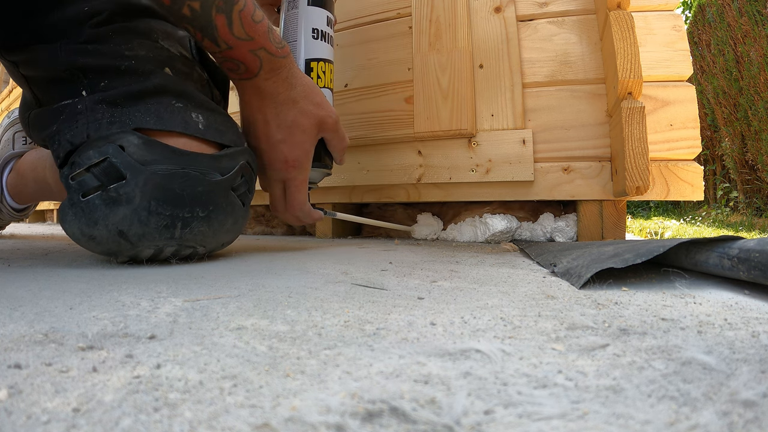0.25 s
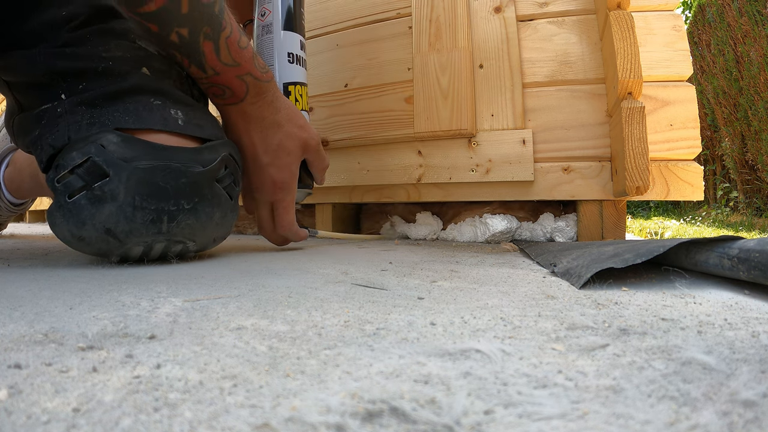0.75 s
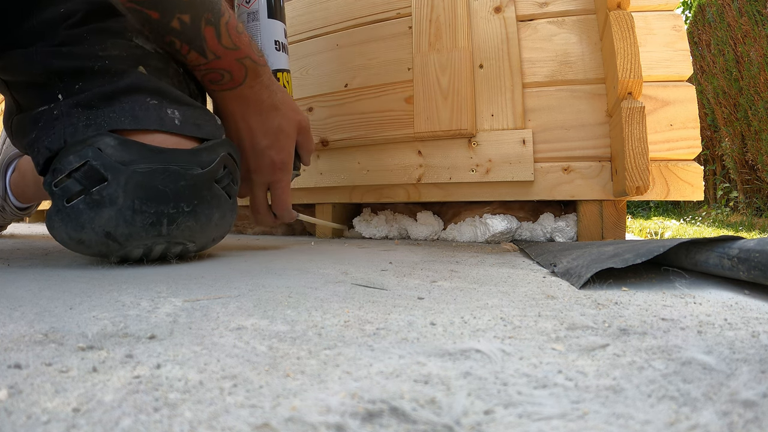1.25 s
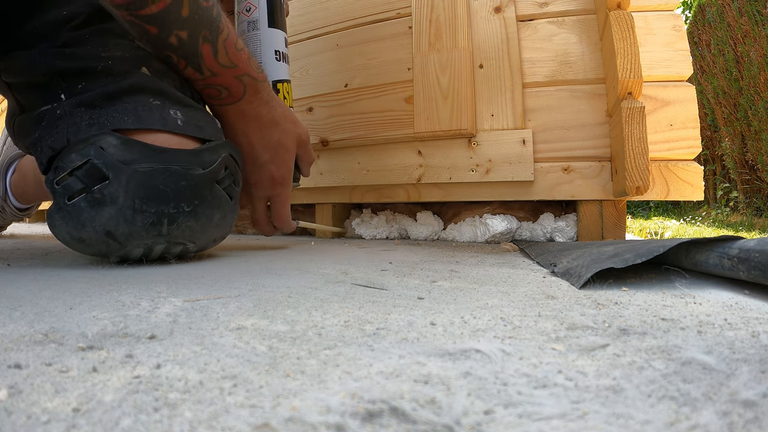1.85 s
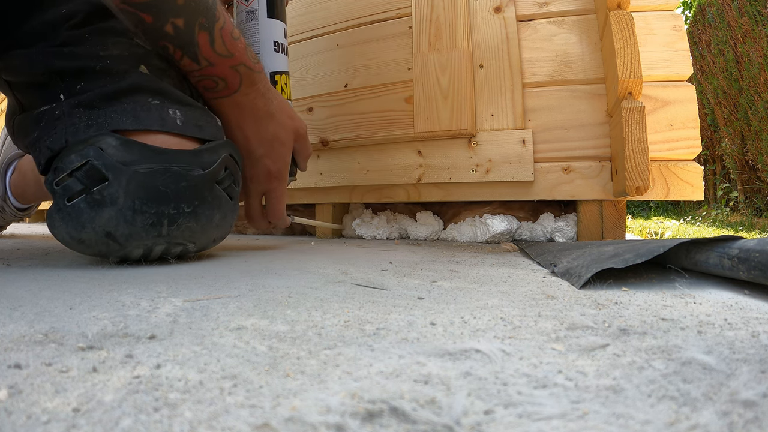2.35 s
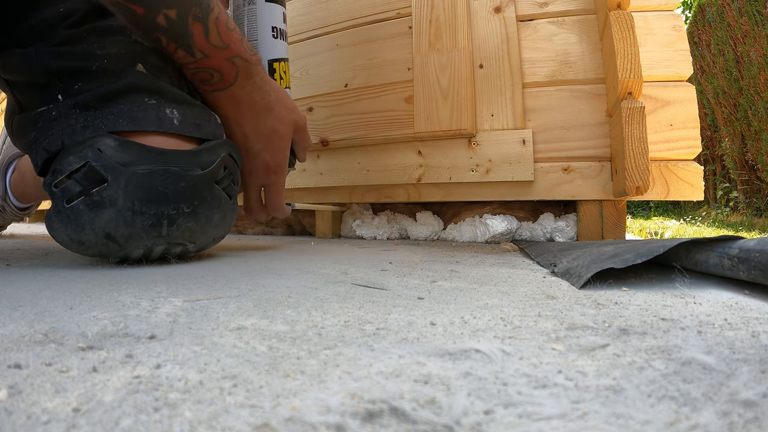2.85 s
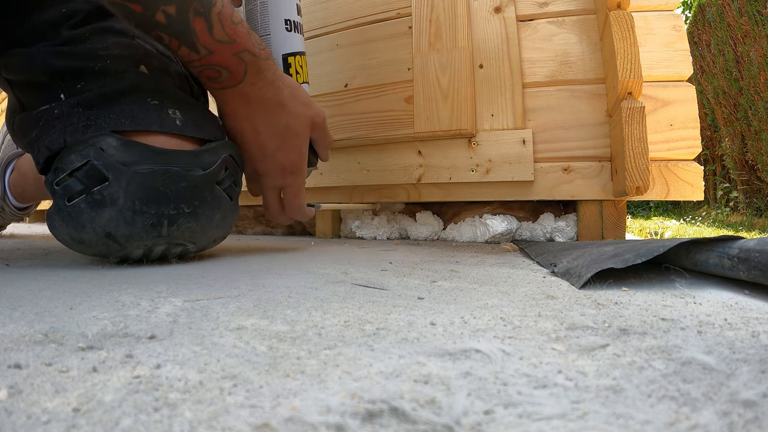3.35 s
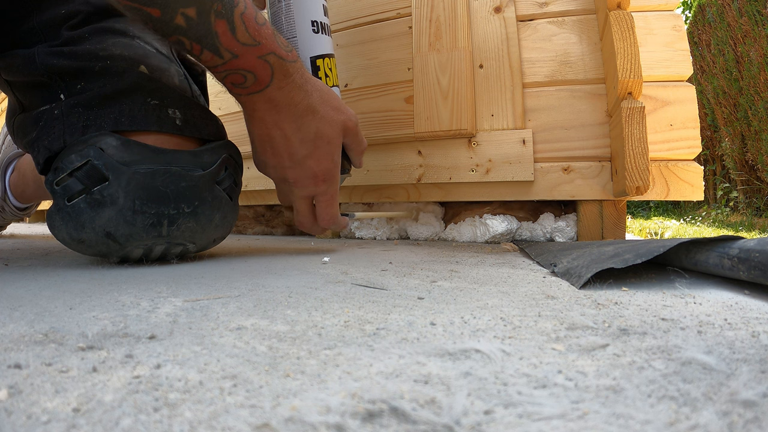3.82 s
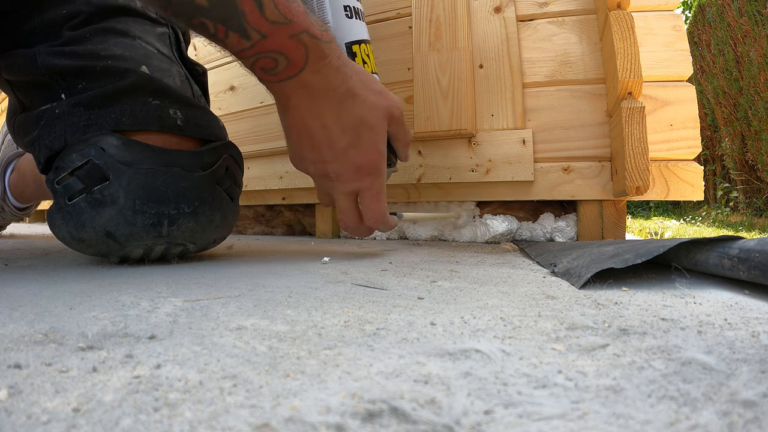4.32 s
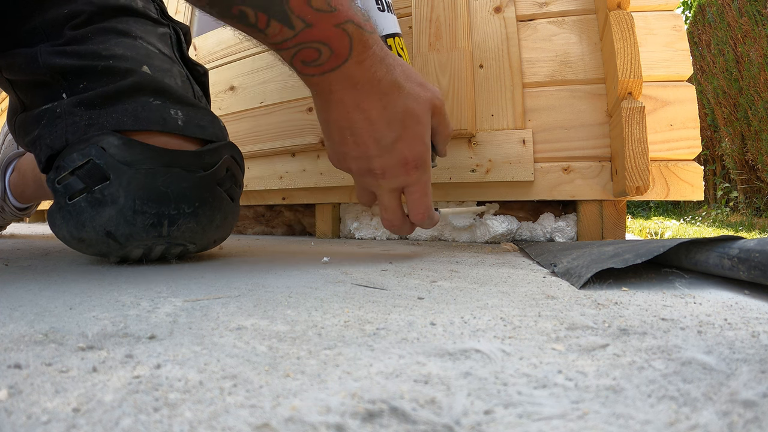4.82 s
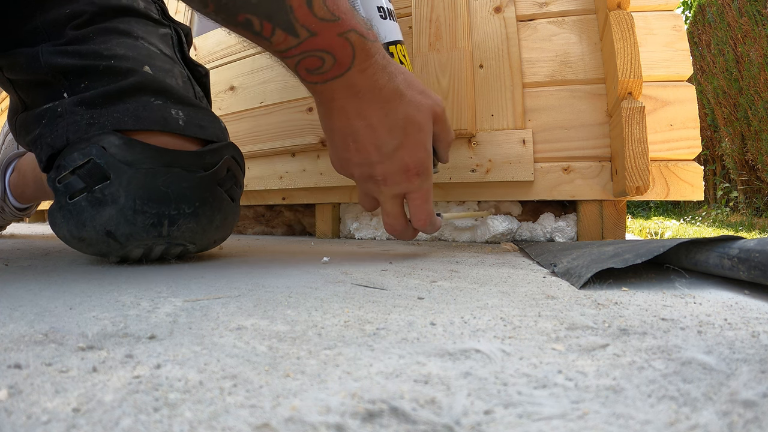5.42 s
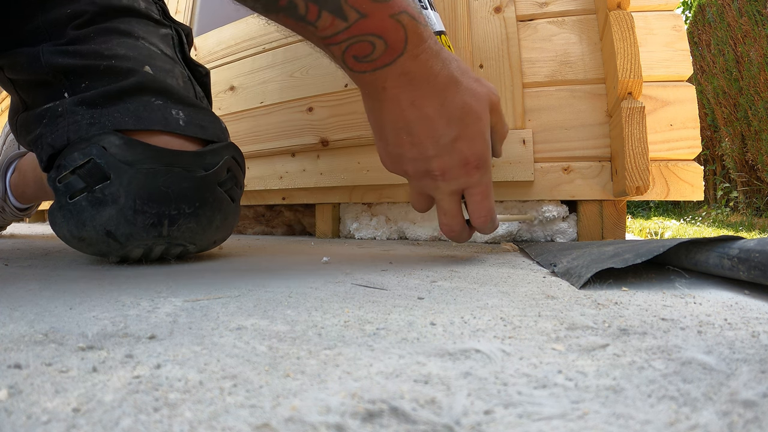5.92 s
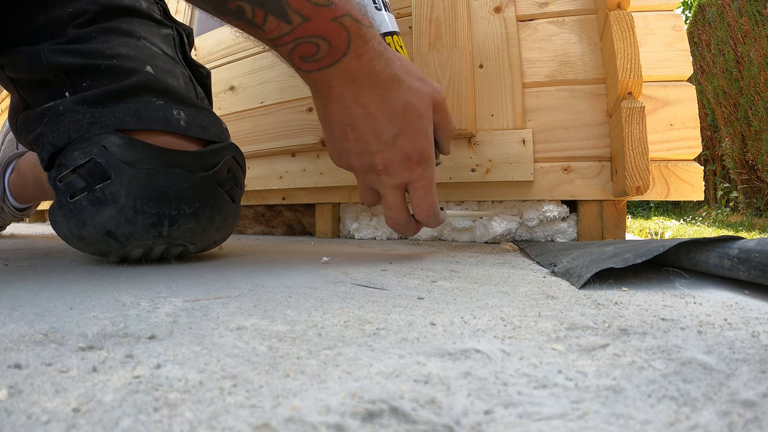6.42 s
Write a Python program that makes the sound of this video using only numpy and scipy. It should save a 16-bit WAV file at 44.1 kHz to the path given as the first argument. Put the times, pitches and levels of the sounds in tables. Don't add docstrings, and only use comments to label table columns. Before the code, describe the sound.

Aerosol foam hisses from a thin straw in sharp short spurts and longer steady jets, with gurgles, tiny snaps and fading fizz in a quiet garden.

```python
import sys
import numpy as np
from scipy import signal
from scipy.fft import rfft, irfft
from scipy.io import wavfile
from scipy.ndimage import uniform_filter1d

SR = 44100
rng = np.random.default_rng(int(sys.argv[2]) if len(sys.argv) > 2 else 0)


def attenuation_scalar(level_db):
    decades = np.asarray(level_db, float) / 20
    return 10 ** decades


def pcm_store(signal):
    levels = np.round(np.clip(np.atleast_2d(signal), -1, 1) * 32767)
    wavfile.write(sys.argv[1], SR, levels.astype(np.int16).T)


N = 294147

# time_s, gas_flow_db, foam_load_db
FIRST_STROKES = [
    [(0, -39, 1), (.25, -42, -1.5), (.308, -33, -3.5), (.388, -37.5, -3), (.444, -32, -3.5),
     (.505, -39, -6.5), (.54, -59, -10.5), (.585, -66, -20)],
    [(.603, -44.5, 1.5), (.65, -58.5, -1), (.7, -75, 4.5)],
    [(.718, -58, -2.5), (.762, -47, 0), (.772, -24.5, 2), (.792, -30, 4), (.803, -12.5, -0.5),
     (1.04, -14, -2.5), (1.06, -13, 3), (1.128, -12.5, -2), (1.206, -15.5, 1.5)],
    [(1.743, -57.5, 3.5), (1.749, -41, 3.5), (1.762, -32.5, 2.5), (1.788, -25, 4), (1.798, -10.5, 1),
     (1.84, -14.5, -1.5), (1.886, -12.5, 2.5), (1.896, -14, -3.5), (1.908, -34.5, 1)],
]
SHORT_STROKES = [
    [(2.293, -49.5, -2.5), (2.297, -33, 6.5), (2.316, -32.5, -5), (2.323, -19.5, 3), (2.377, -12.5, 0),
     (2.402, -12.5, -4.5), (2.407, -23.5, -3), (2.418, -31.5, 3.5)],
    [(2.872, -61, -5), (2.876, -50.5, 3), (2.912, -48, -7.5), (2.918, -33, 2), (2.936, -30.5, 4.5),
     (2.952, -16.5, 3), (2.996, -16.5, 0), (3.024, -18, -2), (3.036, -38, 1.5)],
    [(3.28, -76, -9.5), (3.305, -72, -8.5), (3.33, -66, -4.5), (3.345, -74.5, -7.5), (3.365, -74, -6.5)],
]
LONG_STROKES = [
    [(3.37, -82.5, -5), (3.383, -60.5, -1), (3.4, -49.5, 1), (3.404, -36.5, -2.5), (3.428, -32.5, 7.5),
     (3.438, -20.5, 0), (3.63, -20, -1), (3.94, -18.5, -1.5), (4.078, -19, -0.5), (4.278, -19, -0.5),
     (4.406, -17.5, 1), (4.412, -28, 6)],
    [(4.861, -83, -18), (4.92, -78, -16.5), (5.0, -76.5, -18), (5.03, -67, -9.5), (5.099, -62, 2),
     (5.129, -54.5, 6.5), (5.15, -61, 1), (5.245, -58.5, 3), (5.275, -63.5, -1.5), (5.39, -57.5, 1)],
    [(5.395, -56.5, -8), (5.407, -39.5, 2.5), (5.432, -27.5, -1), (5.44, -17, 0.5), (5.46, -18.5, -5.5),
     (5.55, -17.5, -4.5), (5.8, -19.5, 1.5), (5.952, -19, -0.5), (5.998, -23.5, 2)],
]
STROKES = FIRST_STROKES + SHORT_STROKES + LONG_STROKES

# (centre_hz, width_hz, level_db)
STRAW_PLACES = [
    (0, -19, 7870, -4.5, [(475, 310, -9.5), (960, 380, -19), (1670, 190, -20), (2800, 560, -14.5), (3400, 490, -12.5), (7070, 1200, -16), (10160, 600, -35.5)]),
    (0.252, -23, 8160, -7, [(490, 370, -3.5), (865, 410, -10), (1604, 74, -14), (3160, 470, -11), (6990, 2000, -20), (8740, 530, -31.5), (10300, 460, -26)]),
    (0.53, -12, 2300, -1.5, [(400, 630, -1.5), (1300, 700, -14.5), (4530, 1500, -12), (7200, 1400, -15)]),
                (.7, -2.5, 8900, -4.5, [(970, 120, 0), (1710, 160, -5), (2030, 140, -11.5), (2700, 360, -1), (3225, 560, 12), (4020, 500, 4), (4720, 350, -2), (5400, 400, -8), (6100, 350, -1), (6600, 200, -1), (7650, 1100, -2.5), (10140, 1400, -5)]),
    (.91, -7, 8900, -5, [(470, 200, -2.5), (985, 130, 1.5), (1637, 130, -6.5), (2090, 150, 0), (3200, 570, 8.5), (5800, 600, -3), (6770, 300, 0.5), (7700, 450, -1.5), (9430, 310, -6), (10680, 600, -7.5)]),
    (1.02, -8.5, 9000, -6, [(655, 450, -8.5), (998, 150, 4.5), (1604, 110, -3), (2080, 230, -1.5), (2690, 250, 4.5), (3290, 500, 9), (4010, 470, 5), (5600, 920, 3), (6930, 670, 0), (7960, 270, -8), (10200, 500, -14.5)]),
                (1.5, -12, 9100, -10.5, [(1025, 100, -1), (1620, 110, -5), (2080, 94, -4), (2800, 190, -3), (3240, 390, 6), (3794, 150, 1), (4200, 380, -8.5), (6990, 730, -10), (10070, 690, -21)]),
    (2.2, -7, 8760, -8.5, [(1017, 130, 5.5), (1620, 260, -4.5), (2060, 170, -3.5), (3260, 130, 7), (3650, 200, 2.5), (3980, 210, -1.5), (5400, 260, -9), (6950, 730, -6), (7830, 430, -12), (10590, 650, -10.5)]),
                (2.7, -2, 8770, -5.5, [(1082, 140, 5.5), (1598, 110, 0.5), (3075, 210, 5.5), (3690, 150, -4.5), (4240, 450, 0), (5080, 150, -9.5), (5570, 240, -7), (6325, 840, -4), (7240, 800, -1), (9940, 500, -14.5)]),
                (3.2, -3.5, 2240, -13, [(1040, 150, 6.5), (1610, 150, -9), (3147, 130, -2), (3970, 220, -8), (5340, 390, 6), (6200, 870, 4), (7120, 250, -1), (8830, 600, -9), (9500, 330, -5)]),
    (3.56, -4, 2220, -5.5, [(1006, 300, -1.5), (3115, 150, 2), (4000, 470, 5.5), (5330, 690, 5), (6710, 500, -2), (7950, 250, -9), (9140, 390, -7), (11100, 600, -13)]),
    (3.7, -2.5, 2000, -9.5, [(1036, 390, -1.5), (3036, 160, 5), (3696, 240, 2.5), (3980, 150, 0.5), (4940, 390, 4), (5530, 490, 4.5), (6500, 330, 0.5), (8660, 140, -9), (9450, 500, -0.5)]),
    (3.87, -4, 1650, -3, [(690, 520, 1), (1000, 320, -0.5), (3110, 550, 5), (3700, 200, 7), (4170, 470, 2.5), (5360, 430, -1), (5740, 300, 1), (6760, 250, -3.5), (9300, 490, -8)]),
                (4.0, -1, 1500, -1, [(512, 150, 4), (980, 400, 4.5), (2620, 300, -3.5), (3150, 350, 9.5), (5350, 300, 2), (5970, 300, 4.5), (9000, 900, -4.5)]),
    (4.11, 0.5, 1500, -8, [(515, 120, -1), (900, 440, 5), (2570, 250, 2), (3080, 400, 2), (3710, 230, 6.5), (4440, 230, -1), (5160, 220, 0.5), (6070, 300, 1.5), (9000, 900, -5)]),
    (4.23, 0.5, 7275, -3.5, [(745, 410, 2.5), (2480, 680, 7.5), (3070, 500, 10.5), (3500, 250, 14), (5705, 910, 1.5), (6400, 300, -4), (7920, 160, -0.5), (8600, 390, -5.5), (9990, 180, -9)]),
                (4.7, -26, 1368, -29.5, [(430, 570, 12), (2650, 600, -14), (5630, 570, -20.5), (8590, 550, -23.5)]),
    (5.02, -27, 1353, -33.5, [(430, 540, 9), (2566, 350, -14), (3030, 180, -15.5), (3656, 230, -20), (5656, 570, -20), (6730, 660, -27), (8600, 480, -26.5), (11000, 500, -28.5)]),
                (5.39, -2.5, 1500, -8, [(474, 640, -4.5), (817, 300, 0.5), (3050, 350, 7), (3500, 140, 4.5), (4330, 201, 0), (5506, 540, 7.5), (6070, 540, 1.5), (7280, 200, -6.5), (8600, 600, -7), (10300, 400, -2.5)]),
    (5.58, -3, 1600, -3.5, [(774, 390, 5.5), (2793, 430, 2.5), (3500, 200, -1.5), (5530, 640, 5.5), (6200, 360, 5), (7120, 360, -0.5), (7650, 230, -5.5), (10080, 800, -10)]),
    (5.76, -2.5, 7000, -3.5, [(600, 270, -2.5), (2860, 330, 7.5), (3570, 160, 0), (4090, 200, -5), (5300, 730, 5.5), (6320, 197, -6), (7750, 520, -3.5), (8950, 350, -8.5), (10400, 730, -4)]),
    (5.88, -1.5, 7000, 0.5, [(698, 540, 6), (2840, 280, 5), (3480, 170, 2), (5010, 550, 3.5), (6450, 310, -0.5), (7694, 600, -3.5), (10380, 580, -6.5)]),
]
PLACES = STRAW_PLACES

# frequency_hz, level_db_per_hz
JET_SPECTRUM = [(24, -51), (40, -24.5), (267, -3), (473, 6.5), (563, 0.5), (976, 3), (1190, -10.5),
                (1780, -5), (2340, -6.5), (3070, -0.5), (4470, -8.5), (5320, -6.5), (8770, -7),
                (15600, -15)]
# time_s, treble_db
TIP_AIM = [(0, 3.5), (.3, 1.5), (.5, 0), (.56, 3.5), (.66, 3), (.74, -3), (.79, -1.5), (.805, -1), (.9, 3),
           (1.02, -2), (1.14, 4), (1.21, 0.5), (3.45, 1.5), (3.6, 2), (3.75, 1), (4.0, -1), (4.3, 1.5),
           (4.95, -7), (5.04, .5), (5.47, 0.5), (5.6, -0.5), (5.74, 1), (5.95, 0.5)]
# time_s, level_at_14khz_db
HAND_SHADE = [(0, -0.5), (.85, -2.5), (1.1, -1), (1.8, -6.5), (2.4, -3), (3.0, -3), (3.6, 0.5), (4.3, -4),
              (5.2, 1), (5.7, 1)]
# gurgle_db, sizzle_db, air_db, treble_sag_db (as pressure drops), fizz_db
STRAW_LIE = [(-7, -11, -20.5, 7, -79), (-33, -14, -21, -0.5, -87.5), (-17, -4.5, -14, 9.5, -47.5),
             (-18.5, -3.5, -9, 23, -52), (-14, -3, -10.5, 11.5, -49.5), (-12.5, 0.5, -7.5, 9.5, -43.5),
             (-14.5, 3, -12, 0, -96), (-12.5, 1, -9, 7.5, -51), (-22, -4.5, -13.5, 3.5, -85),
             (-13, -0.5, -10.5, 1, -51)]

DB_PER_FLOW = (0.44, 1, 1, 0.84)
DB_PER_FOAM = (1, -0.014, 0.037, -0.49)
DB_PER_SAG = (0.12, 0.081, -0.92, -0.63)
DB_PER_AIM = (-0.12, -0.93, 1.5, 0.25)
SHUT_DB_PER_S = (430, 980, 1180, 1050)
OPEN_DB_PER_S = (3500, 1800, 1500, 1500)
SWELL_DB = (0.32, 0.22, 0.94, 0.88)
PLUG_DB, PLUG_S = (0.5, 2.5, -9.5, 0), 0.014
EASE_S = 0.0048

MOTTLE_DB, MOTTLE_HZ, MOTTLE_S = 0.9, 600, 0.07
GRAIN_DB, GRAIN_HZ, GRAIN_S = 2.2, 45, 0.16

# time_s, peak_db,
# lowest_hz, highest_hz
SKIN_SNAPS = [(0.1144, -28.5, 3000, 3800), (.205, -36, 2500, 4000), (0.28, -27.5, 2615, 3800),
              (0.3144, -40.5, 4300, 6470), (0.5427, -42, 900, 5300), (0.5891, -46, 3300, 9000),
              (0.6058, -35, 3010, 8360), (.607, -40.5, 800, 2406), (0.617, -37.5, 898, 5500),
              (0.637, -49.5, 1000, 7450), (.7175, -47.5, 1197, 3500), (.727, -43, 2700, 3588),
              (.7323, -39, 2600, 4800), (1.751, -42.5, 9510, 12030), (1.764, -41, 9460, 12020),
              (3.3213, -46.5, 500, 1800), (4.7552, -57.5, 500, 4800), (5.1094, -55.5, 5000, 12000),
              (5.127, -52, 4940, 12000), (5.215, -52, 1206, 2300)]
# time_s, peak_db, pitch_hz
FOAM_BLOBS = [(0.606, -42, 940), (.7175, -36.5, 480), (0.732, -32.5, 368), (3.293, -38, 383.4),
              (3.321, -38.5, 622), (3.334, -30.5, 300), (3.34, -34, 300), (3.385, -27, 430),
              (5.05, -46, 436), (5.076, -45, 359), (5.104, -38.5, 430), (5.116, -39, 500),
              (5.128, -37, 330), (5.166, -36.5, 351), (5.177, -30.5, 420), (5.215, -28, 470),
              (5.215, -37.5, 926), (5.241, -39.5, 400), (5.249, -32.5, 480), (5.259, -28.5, 428),
              (5.314, -49, 757), (5.323, -33, 500), (5.349, -42, 352), (5.363, -37, 760),
              (5.37, -39.5, 300), (5.382, -29, 393)]
# time_s, level_db, decay_s
GAS_PUFFS = [
    (.765, -40, 0.098),
    (1.75, -38, 0.11),
    (2.296, -40.5, 0.11),
    (2.914, -43.5, 0.051),
    (3.4, -38, 0.19),
    (5.405, -38.5, 0.079),
]

# frequency_hz, level_db_per_hz
FIZZ_SPECTRUM = [(290, -30), (500, 4), (583, -10.5), (739, -1.5), (861, -12), (1250, -15), (1420, 0),
                 (3190, -5), (8360, -13.5), (14000, -32)]
FIZZ_BODY_DB = (0, -1, -1.5, -0.5, 0.5, -5, -1, 6.5, 0, 1)
FIZZ_RING_DB = (-10, -9, -9.5, -3, -10.5, 0, -8.5, -3, -7, -4.5)
FIZZ_PACE = (1, 1, 1.05, 0.91, 1.05, 1.1, 1, 1.2, 1, 1.3)
FIZZ_FADE = (1.1, 0.88, 1.6, 1.5)
FIZZ_DB_PER_S, FROTH_DB, FROTH_DB_PER_S = 64.5, 10.5, 454

# frequency_hz, t60_s
ECHO_DECAY = [(200, 0.16), (1000, 0.94), (3000, 0.1), (8000, 0.089), (15000, 0.042)]
# frequency_hz, level_db_per_hz
GARDEN_SPECTRUM = [(20, -14.5), (70, -5.5), (100, -10.5), (170, -12.5), (240, -22.5), (400, -19.5),
                   (770, -28), (1150, -30), (1600, -36), (2850, -38), (5000, -38.5), (8000, -42.5),
                   (15700, -43)]
# middle_s, half_length_s, level_db
DRONE_SWELLS = [
    (1.658, 0.056, -66),
    (2.207, 0.18, -62),
    (2.578, 0.049, -55),
    (6.658, 0.36, -63),
]
GARDEN_DB, DRONE_DB = -58.5, -85.5


def evened(x):
    return x / np.sqrt(np.mean(x ** 2) + 1e-20)


def read(points, hz):
    f, value = np.transpose(points)
    return np.interp(np.log(hz + 1), np.log(f + 1), value)


def add(mix, s, sound):
    part = mix[round(s * SR):][:len(sound)]
    part += sound[:len(part)]


def filtered(x, order, edges_hz, kind):
    return signal.sosfilt(signal.butter(order, edges_hz, kind, fs=SR, output="sos"), x)


def smooth_patches(patches, bins, frames):
    patches = uniform_filter1d(patches, max(round(bins), 1), 0)
    return evened(uniform_filter1d(patches, max(round(frames), 1), 1))


def noise(gain, size, patchy_db, patch_hz, patch_s):
    hop = size // 4
    hz = np.fft.rfftfreq(size, 1 / SR)
    t = np.arange(N // hop + 5) * hop / SR
    real, imaginary, patches = rng.standard_normal((len(t), len(hz), 3)).T
    patches = smooth_patches(patches, patch_hz * size / SR, patch_s * SR / hop)
    z = (real + 1j * imaginary) * gain(hz[:, None], t) * attenuation_scalar(patchy_db * patches)
    return signal.istft(z, nperseg=size, noverlap=size - hop)[1][:N]


def mottle(hz, t, db, width_hz, seconds):
    patches = rng.standard_normal((len(hz), len(t)))
    return attenuation_scalar(db * smooth_patches(patches, width_hz / hz[1, 0], seconds / t[1]))


def flutter(hz):
    lowpass = signal.butter(2, hz, fs=SR, output="sos")
    return evened(signal.sosfiltfilt(lowpass, rng.standard_normal(N + 2 * SR))[SR:-SR])


def wander(t, hz):
    rates = hz * np.geomspace(0.3, 2, 8)
    return sum(np.sin(2 * np.pi * (f * t + rng.random())) for f in rates) / 2


def garden():
    def floor_gain(hz, t):
        rumble_db = 1.2 * wander(t, hz=2.2) / (1 + (hz / 250) ** 2)
        return attenuation_scalar(read(GARDEN_SPECTRUM, hz) + rumble_db)

    def drone_gain(hz, t):
        peak = 1 / (1 + ((hz - 1170) / 130) ** 2)
        return peak + 0.15 / (1 + (hz / 4500) ** 4) + 0.28 / (1 + (hz / 800) ** 4)

    floor = evened(noise(floor_gain, 1024, patchy_db=2.5, patch_hz=300, patch_s=0.1))
    drone = evened(noise(drone_gain, 1024, patchy_db=3.0, patch_hz=200, patch_s=0.08))
    t = np.arange(N) / SR
    swells = attenuation_scalar(DRONE_DB)
    for middle, half, db in DRONE_SWELLS:
        swells = swells + attenuation_scalar(db) * np.exp(-((t - middle) / half) ** 2)
    return attenuation_scalar(GARDEN_DB) * floor + swells * drone


def ranges(hz):
    low, mid, high = [1 / (1 + (hz / edge) ** 24) for edge in (1350, 4500, 8000)]
    return [low, mid - low, high - mid, 1 - high]


def trigger():
    t, gains = np.arange(N) / SR, np.zeros((4, N))
    laws = [DB_PER_FLOW, DB_PER_FOAM, DB_PER_SAG, SHUT_DB_PER_S, OPEN_DB_PER_S, PLUG_DB, DB_PER_AIM]
    for rows, (gurgle_db, sizzle_db, air_db, sag_db, _) in zip(STROKES, STRAW_LIE):
        s, flow_db, foam_db = np.transpose(rows)
        now = t[(t >= s[0] - 0.03) & (t < s[-1] + 0.2)]
        since_shut = np.maximum(now - s[-1], 0)
        drives = [
            np.interp(now, s, flow_db),
            np.interp(now, s, foam_db),
            np.interp(now, s[[0, -1]], (0, sag_db)),
            -since_shut ** 2 / (since_shut + EASE_S),
            -np.maximum(s[0] - now, 0),
            np.exp(-np.maximum(now - s[0], 0) / PLUG_S),
            np.interp(now, *np.transpose(TIP_AIM)),
        ]
        range_db = np.transpose(laws) @ drives
        for gain, db, lie_db in zip(gains, range_db, (gurgle_db, 0, sizzle_db, air_db)):
            add(gain, now[0], attenuation_scalar(db + lie_db))
    return uniform_filter1d(gains, size=130)


def colour(hz, t):
    power = np.zeros((len(hz), len(t)))
    place = np.searchsorted([row[0] for row in PLACES], t, "right") - 1
    for k, (_, broad_db, notch_hz, notch_db, modes) in enumerate(PLACES):
        here = t[place == k]
        part = attenuation_scalar(2 * (read(JET_SPECTRUM, hz) + broad_db)) + 0 * here
        for f, width, db in modes:
            off = 2 * (hz - f * (1 + 0.008 * wander(here, hz=3))) / width
            swell_db = 0.43 * wander(here, hz=6)
            part += attenuation_scalar(2 * (db + swell_db)) / (1 + off ** 2 + 1.1 * off ** 4)
        notch = np.exp(-((hz - notch_hz) / (150 + 0.097 * notch_hz)) ** 2)
        power[:, place == k] = part * attenuation_scalar(2 * notch_db * notch)
    shade_db = np.interp(t, *np.transpose(HAND_SHADE))
    power = power * attenuation_scalar(2 * shade_db * np.clip((hz - 10500) / 3500, 0, 1.5))
    power = sum(share * power / (share * power).sum(0) for share in ranges(hz))
    gain = np.sqrt(uniform_filter1d(power, size=13, axis=1))
    gain = gain * mottle(hz, t, MOTTLE_DB, MOTTLE_HZ, MOTTLE_S)
    return gain * mottle(hz, t, GRAIN_DB, GRAIN_HZ, GRAIN_S)


def spray():
    z = rfft(noise(colour, 1024, patchy_db=1.5, patch_hz=400, patch_s=0.037))
    shares = np.sqrt(ranges(np.fft.rfftfreq(N, 1 / SR)))
    shared = flutter(hz=91)
    flutter_db = (0.49, 0.64, 0.25, 1.5)
    out = 0
    for share, gain, swell_db, depth_db in zip(shares, trigger(), SWELL_DB, flutter_db):
        part = irfft(z * share, N)
        part = part / np.sqrt(uniform_filter1d(part ** 2, size=6000) + 1e-20)
        swell = swell_db * flutter(hz=7.9)
        quick = depth_db * (0.73 * shared + 0.35 * flutter(hz=150))
        out = out + part * gain * attenuation_scalar(swell + quick)
    return filtered(out, 2, 140, "highpass")


def echo(x):
    hz, t, z = signal.stft(rng.standard_normal(SR), SR, nperseg=256)
    decay = attenuation_scalar(-60 * t / read(ECHO_DECAY, hz)[:, None])
    tail = signal.istft(z * decay, SR, nperseg=256)[1]
    return signal.fftconvolve(x, tail / np.linalg.norm(tail))[:N]


def snaps():
    out, t = np.zeros(N), np.arange(900) / SR
    envelope = np.exp(-t / 0.0046) * np.minimum(t / 0.00082, 1)
    for s, db, low_hz, high_hz in SKIN_SNAPS:
        tick = filtered(rng.standard_normal(len(t)), 3, (low_hz, high_hz), "bandpass")
        add(out, s, attenuation_scalar(db) * evened(tick) * envelope)
    return out


def fizz():
    gains, t = np.zeros((4, N)), np.arange(SR) / SR
    collapse = attenuation_scalar(FROTH_DB - FROTH_DB_PER_S * t)
    strokes = zip(STROKES, STRAW_LIE, FIZZ_BODY_DB, FIZZ_RING_DB, FIZZ_PACE)
    for rows, lie, body_db, ring_db, pace in strokes:
        shut_s, fizz_db = rows[-1][0], lie[-1]
        for gain, fade, db, froth in zip(gains, FIZZ_FADE, (body_db, 0, 0, ring_db), (1, 1, 1, 0)):
            sinking = attenuation_scalar(-fade * pace * FIZZ_DB_PER_S * t)
            add(gain, shut_s, attenuation_scalar(fizz_db + db) * (sinking + froth * collapse))

    def hiss_gain(hz, t):
        return attenuation_scalar(read(FIZZ_SPECTRUM, hz) + 2 / (1 + ((hz - 3200) / 700) ** 2))

    hiss = noise(hiss_gain, 512, patchy_db=2.1, patch_hz=500, patch_s=0.04)
    z, hz = rfft(evened(hiss)), np.fft.rfftfreq(N, 1 / SR)
    low, mid = (1 / (1 + (hz / edge) ** 6) for edge in (2200, 4800))
    ring = 1 / (1 + ((hz - 3300) / 1050) ** 8)
    out = 0
    for share, gain in zip((low, mid - low, 1 - mid, ring), gains):
        out = out + irfft(z * share, N) * uniform_filter1d(gain, size=400)
    return out


def blobs():
    out, t = np.zeros(N), np.arange(900) / SR
    envelope = 2.4 * t / 0.0016 * np.exp(-t / 0.0016)
    for s, db, hz in FOAM_BLOBS:
        add(out, s, attenuation_scalar(db) * envelope * np.sin(2 * np.pi * hz * t * (1.08 - 8 * t)))
    return out


def puffs():
    gain, t = np.zeros(N), np.arange(SR // 2) / SR
    for s, db, decay in GAS_PUFFS:
        add(gain, s, attenuation_scalar(db) * np.minimum(t / 0.012, 1) * np.exp(-t / decay))
    return gain * evened(filtered(rng.standard_normal(N), 2, (75, 260), "bandpass"))


def scene():
    foam = spray() + snaps() + blobs() + puffs()
    rise = np.minimum(np.arange(N) / (0.002 * SR), 1)
    mix = garden() + foam + attenuation_scalar(-42.5) * echo(foam) + fizz()
    return np.tile(rise * mix, (2, 1))


def top_cut(x):
    return signal.sosfilt(signal.butter(12, 15720, fs=SR, output="sos"), x)


def record(dry):
    white = rng.standard_normal(dry.shape)
    low = evened(signal.lfilter(*signal.butter(1, 100, fs=SR), white))
    hiss = attenuation_scalar(-76) * white + attenuation_scalar(-78) * low
    limited = np.clip(dry + hiss, -1, 1)
    band_limit = signal.firwin(511, 15650, window=("kaiser", 9), fs=SR)
    return top_cut(signal.oaconvolve(limited, band_limit[None], "same"))


dry = scene()
out = record(dry)
pcm_store(out)
```